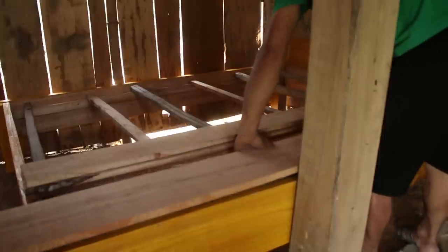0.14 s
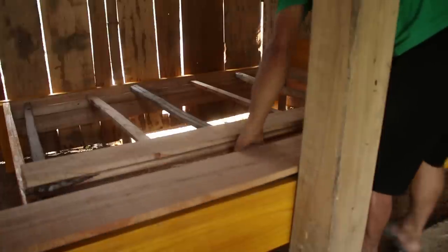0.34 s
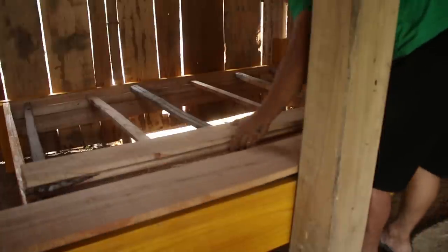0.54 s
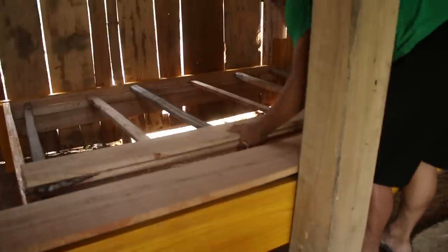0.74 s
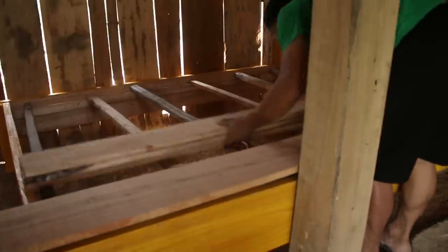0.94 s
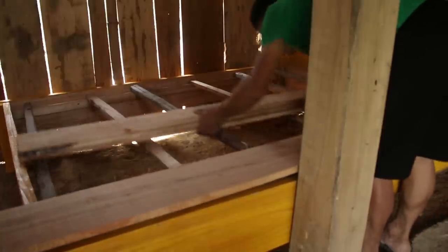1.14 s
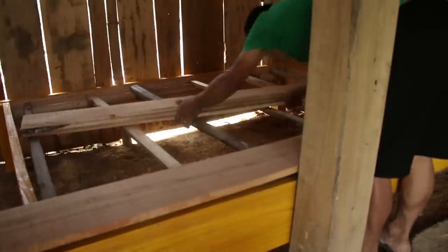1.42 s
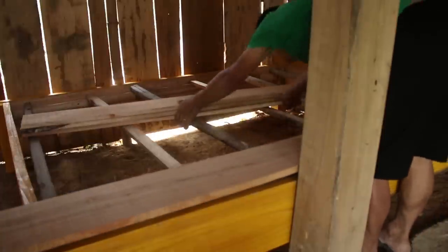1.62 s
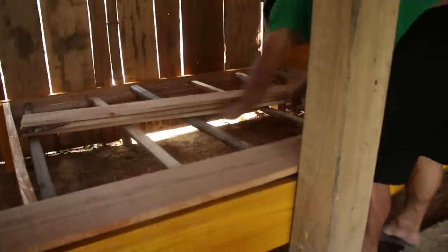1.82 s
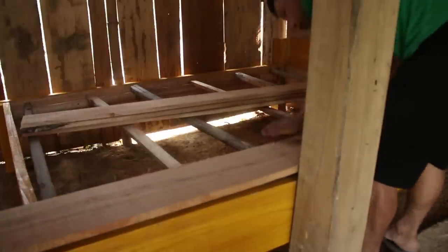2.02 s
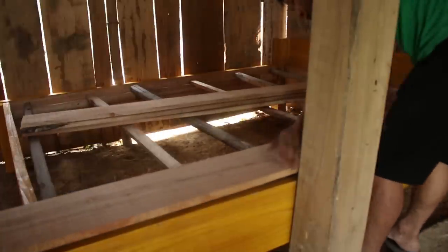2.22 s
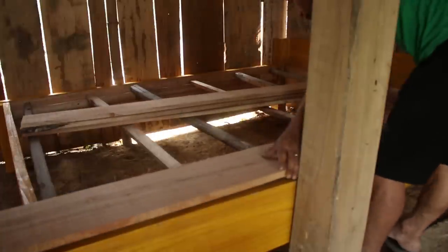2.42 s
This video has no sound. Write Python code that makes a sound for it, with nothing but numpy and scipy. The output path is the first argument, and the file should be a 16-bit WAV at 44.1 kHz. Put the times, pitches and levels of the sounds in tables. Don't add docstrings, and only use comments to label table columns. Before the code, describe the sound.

Wooden plank drops with a hard knock, then drags roughly and clatters against another board

```python
import sys
import numpy as np
from scipy import signal
from scipy.fft import rfft, irfft
from scipy.io import wavfile
from scipy.ndimage import uniform_filter1d

SR = 44100
rng = np.random.default_rng(int(sys.argv[2]) if len(sys.argv) > 2 else 0)


def gain_from_db(level_db):
    decades = np.asarray(level_db, float) / 20
    return 10 ** decades


def generate_wav(sig):
    pcm = np.round(np.clip(np.atleast_2d(sig).T, -1, 1) * 32767).astype(np.int16)
    wavfile.write(sys.argv[1], SR, pcm)


N = 112454


def evened(x):
    return x / np.sqrt(np.mean(x ** 2) + 1e-20)


def read(points, hz):
    f, value = np.transpose(points)
    return np.interp(np.log(hz + 1), np.log(f + 1), value)


def add(mix, start_s, sound):
    part = mix[round(start_s * SR):][:len(sound)]
    part += sound[:len(part)]


def resonate(x, hz, width_hz):
    radius = np.exp(-np.pi * width_hz / SR)
    poles = [1, -2 * radius * np.cos(2 * np.pi * hz / SR), radius ** 2]
    return evened(signal.lfilter([1, -1], poles, x))


def colour(x, points):
    gain = gain_from_db(read(points, np.fft.rfftfreq(len(x), 1 / SR)))
    return evened(irfft(rfft(x) * gain, len(x)))


def filtered(x, order, hz, kind="low"):
    return signal.sosfilt(signal.butter(order, hz, kind, fs=SR, output="sos"), x)


def slow(seconds):
    span = max(int(seconds * SR), 2)
    once = uniform_filter1d(rng.standard_normal(N), span)
    return evened(uniform_filter1d(once, span))


def grit(slips_per_s=9000):
    slips = rng.random(N) < slips_per_s / SR
    return evened(slips * rng.standard_normal(N))


def ring(hz, db, t60, rise_s=0.0012):
    t = np.arange(SR // 2) / SR
    return gain_from_db(db - 60 * t / t60) * np.sin(2 * np.pi * hz * t) * (1 - np.exp(-t / rise_s))


def crack():
    t = np.arange(SR // 2) / SR
    snap = gain_from_db(-7 - 60 * t / 0.02)
    frame = gain_from_db(-5 - 60 * t / 0.13) * np.minimum(t / 0.007, 1)
    return (snap + frame) * rng.standard_normal(len(t))


def knock(modes, blows):
    out = np.zeros(N)
    for k, (s, db, contact_s) in enumerate(blows):
        bounce = k > 0
        shifts = 0.03 * bounce * rng.standard_normal(len(modes))
        levels_db = 3 * bounce * rng.standard_normal(len(modes))
        body = np.zeros(SR // 2)
        for j, (hz, mode_db, t60) in enumerate(modes):
            sign = -1 if hz > 500 and j % 2 else 1
            body += sign * gain_from_db(levels_db[j]) * ring(hz * (1 + shifts[j]), mode_db, t60)
        push = np.hanning(max(int(contact_s * SR), 3))
        add(out, s, -gain_from_db(db) * signal.fftconvolve(body + crack(), push / push.sum()))
    return out


# (frequency [Hz], level [dB], t60 [s])
DROPPED_MODES = [(62, -34, 0.093), (115, -23, 0.11), (185, 8.5, 0.057), (375.8, 5.5, 0.082),
                 (400, 2.5, 0.086), (456, 4.5, 0.055), (518, 5.5, 0.032), (687, 8, 0.039), (770, -3, 0.16),
                 (890, 12.5, 0.038), (1000, 4, 0.06), (1140, 21.5, 0.015), (1560, 7.5, 0.048),
                 (1896, 18.5, 0.019)]
# (time [s], level [dB], contact [s])
DROPPED_BLOWS = [
    (0.2175, -21.5, 0.0015),
    (0.2216, -40, 0.00032),
    (.236, -37, 0.00088),
    (0.2456, -36.5, 0.00068),
    (.261, -31.5, 0.0013),
    (.282, -36.5, 0.00082),
    (0.309, -52, 0.0011),
    (0.345, -62, 0.0012),
]


def dropped_plank():
    return knock(DROPPED_MODES, DROPPED_BLOWS)


# (frequency [Hz], level [dB], t60 [s])
PUSHED_MODES = [(120, -18.5, 0.11), (185, -8.5, 0.06), (246, -2, 0.042), (378, 2, 0.046),
                (450, -5.5, 0.037), (537, -1, 0.04), (630, -0.5, 0.031), (770, -3, 0.026), (893, 3, 0.038),
                (1012, 1, 0.039), (1135, 6.5, 0.029), (1217, 6.5, 0.031), (1420, 2, 0.016),
                (1684, 0, 0.018)]
# (time [s], level [dB], contact [s])
PUSHED_BLOWS = [
    (1.3841, -25.5, 0.00045),
    (1.3856, -21, 0.00056),
    (1.3917, -23.5, 0.00044),
    (1.3999, -21.5, 0.00071),
    (1.4047, -26, 0.0005),
    (1.4217, -29.5, 0.001),
    (1.444, -36, 0.00082),
    (1.462, -45, 0.00063),
]


def pushed_plank():
    return knock(PUSHED_MODES, PUSHED_BLOWS)


def passing(slips, hz, width_hz, db, at_s, spread_s=0.03):
    t = np.arange(N) / SR
    swell = np.exp(-0.5 * ((t - at_s) / spread_s) ** 2)
    return gain_from_db(db) * swell * resonate(resonate(slips, hz, width_hz), hz, 4 * width_hz)


# (time [s], pressure level into the body [dB], speed level of the hiss [dB])
DRAG_COURSE = [(.86, -71.5, -61), (.912, -50, -52.5), (0.974, -40.5, -41.5), (1.012, -44.5, -40.5),
               (1.07, -40, -37.5), (1.13, -37.5, -36), (1.16, -41, -35), (1.2, -39, -38.5),
               (1.24, -38, -35), (1.29, -41.5, -35.5), (1.335, -40.5, -41.5), (1.35, -36.5, -37),
               (1.376, -40.5, -40.5), (1.417, -35.5, -42.5), (1.5, -52.5, -47), (1.535, -47.5, -51),
               (1.555, -48, -49), (1.6, -54, -69)]
# (frequency [Hz], width [Hz], level [dB], time when loudest [s])
DRAG_MODES = [(171, 43, -1, 1.1), (608, 35, -1.5, 0.958), (1094, 49, -1, 1.016), (936, 60, -2, 1.08),
              (2057, 39, -1.5, 1.093), (408, 43, -5, 1.12), (1390, 31, 0.5, 1.118), (1783, 46, 0, 1.135),
              (2255, 32, -2, 1.13), (530, 97, -2, 1.1), (1475, 50, -7, 1.19), (1495, 46, -3, 1.25),
              (172, 28, 5, 0.79), (2312, 60, -3, 1.265), (2010, 70, -5, 1.21), (1152, 50, -9, 1.34),
              (169, 50, -4, 1.4)]
# (frequency [Hz], level per Hz [dB])
DRAG_SPECTRUM = [(140, -15), (400, -3), (1440, -4.5), (2400, -13), (4000, -25), (10300, -34.5),
                 (11500, -42.5), (15700, -48.5)]
# (frequency [Hz], width [Hz], level [dB], time [s], spread [s])
SPLINTERS = [
    (8100, 1800, -57, 0.972, 0.018),
    (4130, 780, -57, 1.5, 0.049),
    (13000, 5000, -62.5, 1.1, .006),
    (12000, 5000, -65, 1.235, .025),
    (13500, 3000, -72.5, 1.14, .015),
]


def drag():
    s, press_db, speed_db = np.transpose(DRAG_COURSE)
    t, slips = np.arange(N) / SR, grit()
    wide = colour(slips, DRAG_SPECTRUM)
    modes = sum(passing(slips, *mode) for mode in DRAG_MODES)
    body = filtered(wide, 2, 2800) + gain_from_db(-4.5) * modes
    hiss = filtered(wide, 2, 2800, "high")
    pressure = gain_from_db(np.interp(t, s, press_db) + 0.26 * slow(0.0085))
    speed = gain_from_db(np.interp(t, s, speed_db) + 0.21 * slow(0.024))
    moving = (t > s[0]) * np.clip((s[-1] + 0.067 - t) / 0.11, 0, 1)
    catches = sum(passing(slips[::-1], *catch) for catch in SPLINTERS)
    return (body * pressure - hiss * speed) * moving + catches


# (start [s], length [s], level [dB], centre [Hz], width [Hz])
STROKES = [(.0, 0.042, -64.5, 450, 500), (0.017, 0.1, -60.5, 685, 750), (0.157, 0.063, -56, 1440, 890),
           (0.183, 0.093, -44.5, 1570, 766), (0.227, 0.062, -54, 2340, 800),
           (0.249, .13, -62.5, 1970, 1190), (0.406, 0.03, -72, 2040, 1530), (0.417, 0.38, -73.5, 544, 437),
           (0.319, 0.39, -65, 1850, 1740), (0.594, 0.25, -62, 1340, 820), (0.636, 0.14, -68.5, 2730, 905),
           (0.8, 0.11, -73, 900, 900), (0.101, 0.089, -70.5, 900, 905), (2.397, 0.14, -80, 1200, 1200),
           (1.638, 0.12, -73, 2720, 3000), (1.64, 0.17, -61, 910, 600), (1.664, 0.24, -68, 1470, 1460),
           (1.853, 0.14, -62.5, 1630, 1300), (1.915, 0.1, -66, 830, 306), (1.956, 0.23, -74, 730, 600),
           (2.1, 0.023, -78, 1000, 854), (2.193, 0.049, -67.5, 770, 120), (2.296, 0.041, -68, 890, 600),
           (2.328, 0.092, -62, 347, 403), (2.326, 0.078, -66.5, 1670, 1380),
           (2.454, 0.042, -70.5, 1150, 497), (2.5, 0.058, -71, 630, 120)]
# (frequency [Hz], level per Hz [dB])
STROKE_SPECTRUM = [(150, -34.5), (400, 3.5), (1400, 3.5), (4000, -29.5), (8000, -31), (11000, -54),
                   (15700, -75.5)]


def rubs():
    out, slips = np.zeros(N), grit() * gain_from_db(2.0 * slow(0.0017))
    hiss = colour(slips, STROKE_SPECTRUM)
    for s, length_s, db, hz, width_hz in STROKES:
        at = slice(round(s * SR), round((s + length_s) * SR))
        tone = resonate(resonate(slips[at], hz, width_hz), hz, 2 * width_hz) + hiss[at]
        swell = np.sin(np.pi * np.arange(len(tone)) / (length_s * SR)) ** 1.5
        out[at] += gain_from_db(db) * tone * swell
    return out


# (time [s], level [dB], ring [Hz], t60 [s])
TOUCHES = [(0.053, -38, 535, 0.016), (0.065, -43, 365, 0.04), (0.081, -36.5, 240, 0.012),
           (1.55, -43, 55.6, 0.16), (1.5, -48, 96, 0.14), (1.61, -53, 160, 0.054),
           (2.001, -48, 1280, 0.018), (2.11, -48.5, 170, 0.041), (2.153, -69, 120, 0.099),
           (2.227, -64.5, 120, 0.035), (2.31, -54.5, 200, 0.085), (2.293, -55, 1300, 0.022),
           (2.348, -36.5, 540, 0.019), (2.346, -36.5, 1510, 0.011), (2.365, -52, 430, 0.015),
           (2.379, -51.5, 188, 0.12), (2.494, -50.5, 600, 0.041), (2.501, -52.5, 1290, 0.042),
           (2.5, -53, 1770, 0.024), (2.518, -58.5, 607, .12)]


def taps():
    out = np.zeros(N)
    for s, db, hz, t60 in TOUCHES:
        add(out, s, ring(hz, db, t60) + ring(hz * 1.7, db - 7, t60 * 0.5))
    return out


# (time [s], level [dB], centre [Hz], width [Hz])
FIBRE_TICKS = [(.005, -69, 5000, 4000), (2.003, -69, 1206, 1200), (2.11, -69, 700, 1000),
               (.369, -67, 6000, 6000), (.38, -63, 4500, 4000), (.411, -69, 4000, 3500),
               (.465, -65, 7800, 2500), (.488, -67, 6000, 4000), (.522, -61, 7500, 3000),
               (.578, -63, 5980, 1490), (2.347, -66.5, 3500, 3000), (2.368, -61.5, 4300, 1500),
               (2.502, -64, 3500, 3000)]


def ticks():
    out, t = np.zeros(N), np.arange(2000) / SR
    for s, db, hz, width_hz in FIBRE_TICKS:
        puff = resonate(rng.standard_normal(len(t)), hz, width_hz)
        add(out, s, gain_from_db(db - 60 * t / 0.015) * puff)
    return out


# (frequency [Hz], t60 [s])
HUT_DECAY = [(60, 0.54), (200, 0.29), (500, 0.31), (1000, 0.22), (2000, 0.21), (5000, 0.58)]


def hut(x):
    echoes = np.zeros(SR)
    at = np.arange(200, SR - 20, 20)
    echoes[at + rng.integers(0, 20, len(at))] = rng.choice([-1., 1.], len(at))
    hz, t, z = signal.stft(echoes, SR, nperseg=256)
    decay = gain_from_db(-60 * t / read(HUT_DECAY, hz)[:, None])
    tail = signal.istft(z * decay, SR, nperseg=256)[1]
    return signal.fftconvolve(x, tail / np.linalg.norm(tail))[:N]


# (frequency [Hz], level per Hz [dB])
AIR_SPECTRUM = [(20, -4), (60, -2.5), (100, 0), (170, -11.5), (600, -18), (1700, -30), (5000, -34),
                (15700, -40)]


def air():
    noise = colour(rng.standard_normal(N), AIR_SPECTRUM)
    low = filtered(noise, 2, 250)
    return gain_from_db(-62) * (low * gain_from_db(1.0 + slow(0.036)) + (noise - low) * gain_from_db(2.0))


def scene():
    hits = dropped_plank() + pushed_plank() + taps()
    friction = drag() + rubs() + ticks()
    return (hits + gain_from_db(1.5) * hut(hits) + friction + air())[None]


def top_cut(x):
    return signal.sosfilt(signal.butter(12, 15810, fs=SR, output="sos"), x)


def record(dry):
    mix = filtered(dry, 2, 45, "high")
    return top_cut(mix)


dry = scene()
out = record(dry)
generate_wav(out)
```